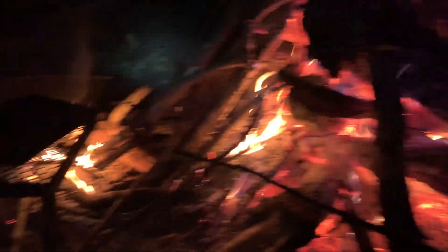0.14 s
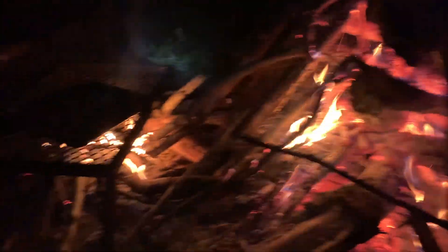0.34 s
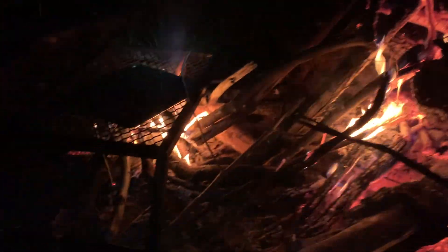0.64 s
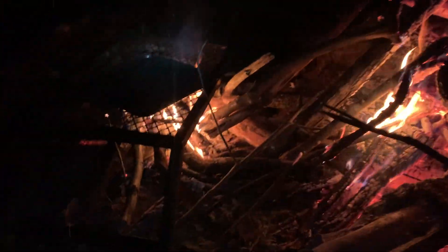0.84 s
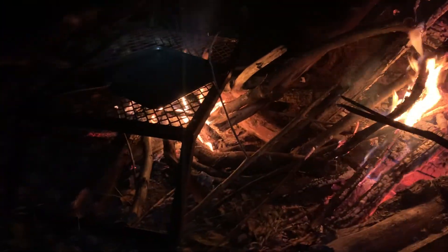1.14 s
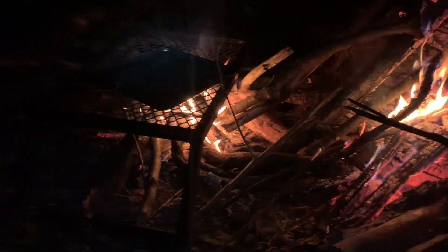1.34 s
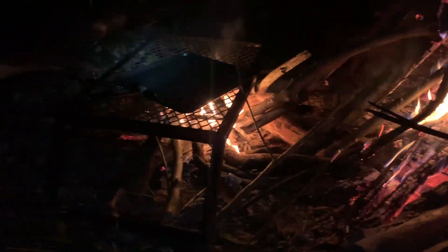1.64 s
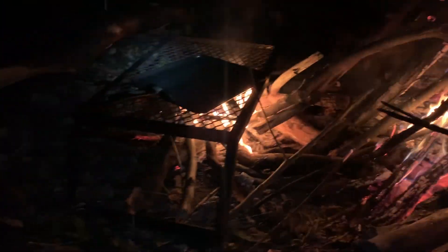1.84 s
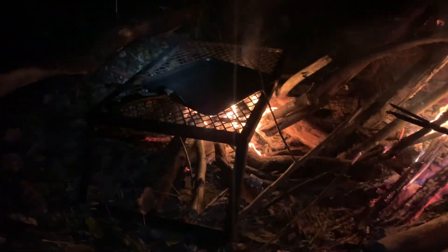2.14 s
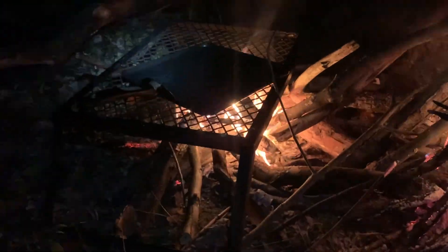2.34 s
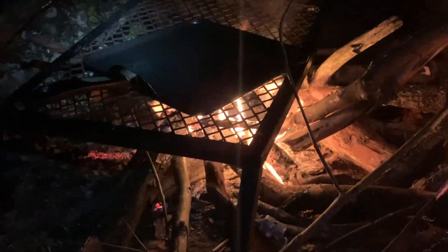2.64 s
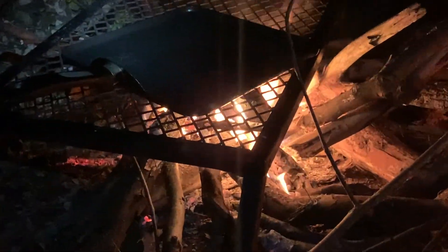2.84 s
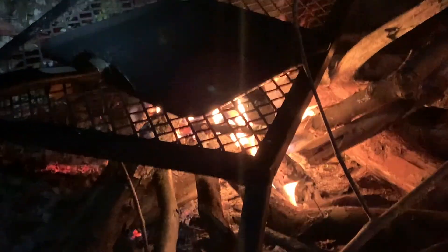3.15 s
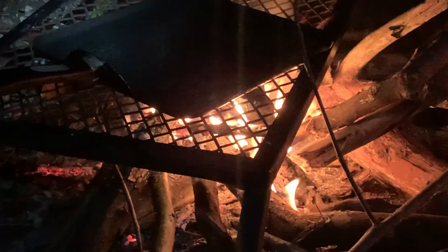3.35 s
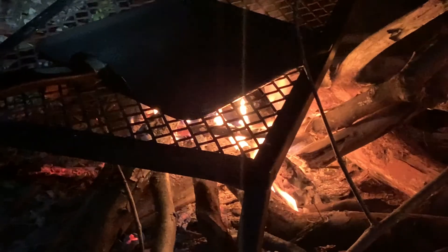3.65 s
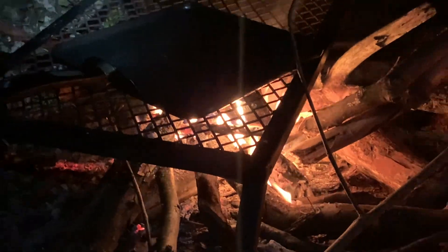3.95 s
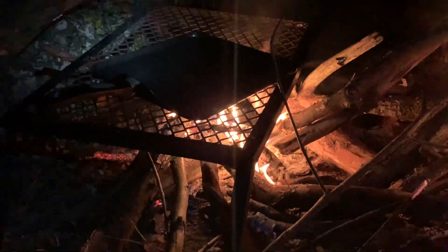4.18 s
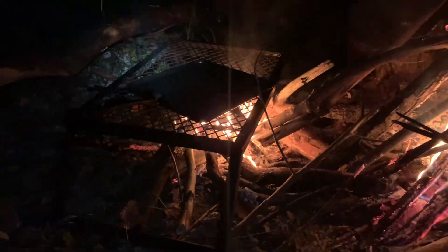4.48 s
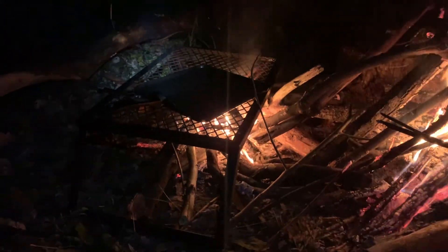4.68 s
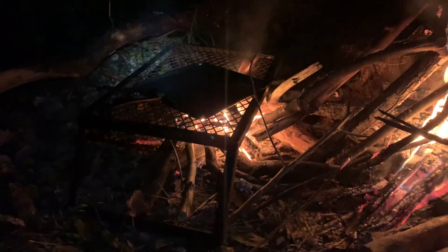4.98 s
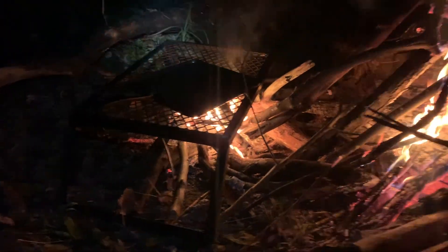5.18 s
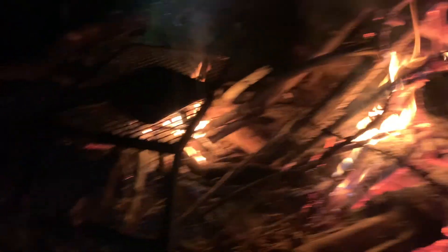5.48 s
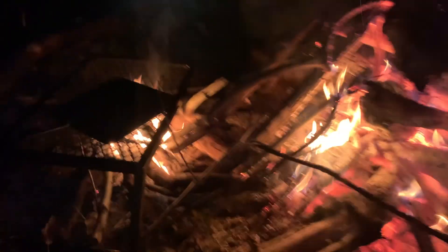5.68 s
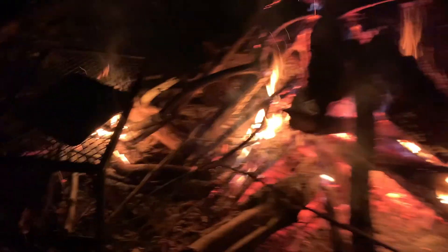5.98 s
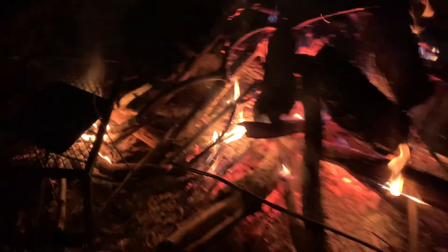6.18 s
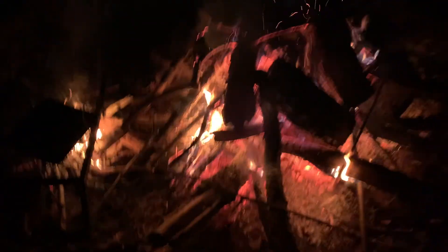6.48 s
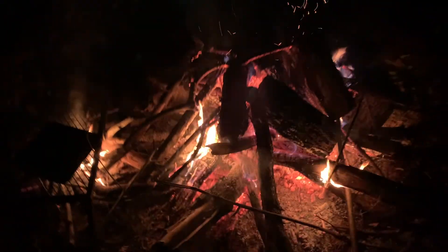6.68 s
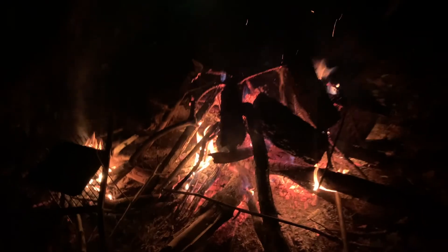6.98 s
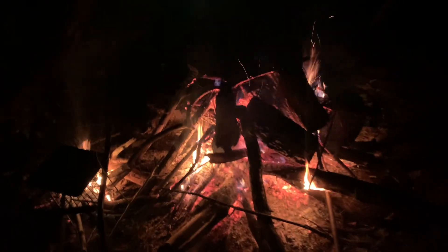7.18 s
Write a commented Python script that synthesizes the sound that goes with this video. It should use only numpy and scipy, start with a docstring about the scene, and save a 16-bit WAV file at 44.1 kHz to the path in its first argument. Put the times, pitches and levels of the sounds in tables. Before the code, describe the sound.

A brush fire burns close to a stereo microphone, slightly to the right, outdoors at night. Flames rumble and flutter softly throughout, under irregular sharp pops and fine ticks. It opens with a light rush of flame and a cluster of pops, and a branch knocks dryly at about 0.9 seconds. A sharp pop comes at 2.2 seconds, then the crackle thins until strong pops with dull knocks around 3.8 and 4 seconds. From 5.5 seconds the fire flares and the popping grows louder; a thick log splits with the loudest crack at 6.2 seconds. Steam hisses and embers snap after it, swelling again around 7 seconds, with a last knock near 7.3. Behind the fire, a few near crickets give short trills over a steady distant chorus and shriller insects. A faint, thin, wavering whine swells at about 2.2 seconds and recedes.

```python
"""Brush fire at night, close to a stereo microphone pair.

Turbulent flames rumble and flutter. Sap pockets burst with sharp pops, branches give way with a
knock, one thick log splits. Flare-ups bring a rush of gas, a hiss of steam and snapping embers.
Crickets trill by wing strokes: a few near, a blurred chorus far off. Behind them are shriller
small insects and a thin whine."""
import sys
import numpy as np
from scipy import signal
from scipy.fft import rfft, irfft
from scipy.io import wavfile
from scipy.ndimage import uniform_filter1d

SR = 44100
rng = np.random.default_rng(int(sys.argv[2]) if len(sys.argv) > 2 else 0)


def store_wav(level_fs):
    """Save 16-bit WAV to argv[1]."""
    pcm = np.round(np.clip(np.atleast_2d(level_fs), -1, 1) * 32767)
    wavfile.write(sys.argv[1], SR, pcm.T.astype(np.int16))


N = 322923
TIME_S = np.arange(N) / SR
FIRE_LAG_MS = .184  # fire on the right: left mic lags
STROKES_PER_S, STROKE_SPREAD_PER_S = 30.5, 1.43  # cricket wings: mean, spread between singers

# Flame and steam noise spectra. Each row: frequency in Hz, relative density in dB.
RUMBLE_SPECTRUM = [(15, -48), (25, -29), (50, 1), (80, -1), (130, -4), (190, -7), (260, -16), (400, -37),
                   (900, -104)]
FLUTTER_SPECTRUM = [(120, -34), (280, -4.5), (460, 2.5), (850, 3), (1250, -3), (2000, -8.5), (4000, -137)]
RUSH_SPECTRUM = [(700, 3), (1300, -1.5), (1750, 8), (2100, 7.5), (2600, 3), (4200, -5), (5200, -6),
                 (9000, -103)]
JET_SPECTRUM = [(200, -25), (600, -6), (2000, -2), (4000, -1), (5500, -3.5), (7200, 0), (9000, -4),
                (11000, -1.5), (13500, -8.5), (16000, -9.5)]
SIZZLE_SPECTRUM = [(300, -1), (2600, -3), (4200, 0), (5500, -4), (7000, 1), (9000, -3), (11000, -2),
                   (14500, 2.5), (16000, 2)]
# Flame envelopes. Each row: time in seconds, level in dB.
RUMBLE_LEVELS = [(0, -38), (.25, -39), (.65, -37.5), (1.5, -37.5), (2.02, -38.5), (2.14, -44), (2.3, -38.5),
                 (3.1, -39.5), (3.7, -38), (4.8, -40.5), (5.2, -38), (5.9, -41.5), (6.55, -43),
                 (6.85, -37.5), (7.1, -40.5), (7.32, -44)]
FLUTTER_LEVELS = [(0, -42), (1.9, -45.5), (2.9, -46.5), (4.2, -51), (5.2, -51), (7.32, -48)]
# Flare-ups. Each row: crest time, rise and fall in seconds, gas level and steam level in dB.
FLARES = [(0.017, 0.33, 0.57, -46.5, -59.5), (2.12, 0.1, 0.15, -53.5, -59.5),
          (5.566, 0.15, 0.22, -40.5, -52), (6.25, 0.089, .26, -41.5, -39), (7.05, .15, .16, -39, -40),
          (7.32, 0.13, .2, -39.5, -32.5)]
# Loudest sap bursts. Each row: start in seconds, level over 10 ms in dB, then woody body,
# 2.5 kHz bite and 13.5 kHz top as tone gains in dB, centre of the pop's broad tone peak in Hz,
# tear time in ms.
POPS = [(0.1642, -31, 6, 6, 2, 1400, 1.1), (0.1697, -27.5, 3, 0, -2, 2600, 0.67),
        (0.25, -34.5, 0, -8, -2, 15000, 0.49), (0.2607, -51, 18, 0, 0, 6400, 0.7),
        (0.28, -30, 10.5, 6, -1.5, 1600, 1), (0.4956, -28.5, 0, -1, 2, 15000, 0.67),
        (0.6134, -51, 14, 7, 3, 8800, 0.7), (0.826, -34, -3, -2, 11, 15000, 0.46),
        (0.8533, -25, 11, -1, 3, 4470, 0.69), (0.8803, -39, 0, 0, -4, 1600, 0.65),
        (0.917, -36, -5, -9, -2, 15000, 0.54), (0.9256, -38, -7, -7, 0, 3400, 0.63),
        (0.938, -26.5, -3, -12, 4.5, 13300, 0.75), (1.1605, -34, 6, -5, 17, 8800, 0.37),
        (1.1742, -37, -1, -3, 11, 8800, 0.6), (1.186, -33, -6, 5, 12, 8800, 1.7),
        (1.2814, -44, 10, 8, -8, 3800, 0.7), (1.3203, -30.5, 0, 3, 2, 15000, 0.3),
        (1.3527, -40, -5, -4, 3, 3400, 0.6), (1.5306, -45, 10, -1, -23, 5200, 0.54),
        (1.5575, -31.5, 0, -1, 9.5, 8900, 0.64), (1.596, -38, 3, 8, 11, 5200, 1.1),
        (1.8688, -38.5, 34, 8, -9, 4700, 1.3), (1.9064, -42.5, 13, 9, -1, 5200, 0.7),
        (1.9746, -38.5, 30, 14, 0, 2200, 0.9), (2.056, -43.5, -4, 0, -7, 4200, 0.58),
        (2.0632, -37, 15.5, 10, -2.5, 1500, 3.5), (2.0916, -37, -2, 4, -8, 13500, 3.7),
        (2.147, -42.5, 3, 2, 9, 7900, 0.55), (2.1582, -36, 10, -1, -6.5, 5800, 0.7),
        (2.1692, -21.5, -4, -8, 4.5, 4660, 1.1), (2.1868, -42.5, 0, 2, 4, 1800, 0.7),
        (2.5348, -41, 5, 0, -3, 15000, 1), (2.9388, -39, 15, -2, -17, 4200, 1),
        (3.0006, -36.5, 4, 3, 14, 8800, 1), (3.5183, -38.5, 11, -18, -0.5, 2000, 0.67),
        (3.5523, -34.5, 9.5, -7, -3, 5140, 1.1), (3.6185, -26, -4, -2, 1, 15000, 0.4),
        (3.6377, -41, 1, -9, 6, 8800, 0.56), (3.6474, -32.5, -8, -11, 6, 8800, 2.4),
        (3.6823, -42.5, 12, 1, -2.5, 1300, 0.7), (3.7986, -19.5, -1, -8, 6.5, 8800, 2.2),
        (3.809, -42, 4, 1, 0, 8800, 0.7), (3.816, -47, -5, -2, 3, 8800, 0.7),
        (3.9948, -23, 2, 4, 8.5, 6460, 1.9), (4.0414, -36.5, 0, -10, -3, 15000, 0.36),
        (4.1425, -35.5, -11, -6, 5, 9800, 0.3), (4.5402, -37.0, 10.5, -14, -3.5, 5200, 0.17),
        (4.861, -42, -5, -3, 19, 7900, 0.5), (4.997, -40, 4, -4, 10, 4200, 0.44),
        (5.0567, -42, -10, -5, -2, 15000, 0.6), (5.067, -32, -2, -5, 5, 1300, 1.8),
        (5.137, -38, -12, 1, 6, 7000, 4.6), (5.171, -44, 1, -1, -4, 12100, 0.8),
        (5.289, -32, 2, -6, 3, 4200, 1.9), (5.447, -37, 3.5, -8, -8, 1300, 0.55),
        (5.5814, -46, 20, 14, 0, 1300, 0.7), (5.6126, -27.5, 2, -1, 10, 8800, 0.19),
        (5.6214, -34.5, 0.5, -1, -15.5, 12100, 0.44), (5.6558, -37, 2.5, -6, -9, 15000, 0.76),
        (5.6671, -37, 7, 4, -20, 10900, 0.68), (5.7121, -32, 13, 2, 4, 8800, 2.1),
        (5.756, -20.5, -5.5, 5, -6, 10000, 0.33), (5.7674, -38.5, 6, -3, 5, 4200, 0.62),
        (6.027, -16.5, -5.5, -9, 3, 10100, 0.67), (6.1027, -36, -14, -9, 4, 7900, 0.99),
        (6.149, -16.5, -1.5, -1, 5, 7300, 0.58), (6.1659, -28, 3.5, -3, -13.5, 12100, 0.56),
        (6.1818, -11.5, -8, -10.5, -14.5, 1880, 1.6), (6.233, -27, -6, -2, -10, 1290, 1.9),
        (6.3075, -24.5, 4, -2, -12, 3500, 0.46), (6.3182, -33, -1, -1, -7, 2700, 0.63),
        (6.3442, -32, -10, -6, 8, 8800, 0.7), (6.4117, -37, -12, 3, 4, 2700, 0.7),
        (6.5105, -37.5, -1, 13, -2, 4200, 0.87), (6.6548, -37, -2, 7, 4, 9900, 1),
        (6.7105, -39.0, 11, 12, -22, 5200, 0.7), (6.763, -37, -8, 7, 12, 8900, 1.1),
        (7.0197, -43, -1, 6, -8, 2000, 0.61), (7.038, -32.5, 3, -6, -4, 15000, 1.4),
        (7.0642, -33, -6, -6, 9, 7900, 1.3), (7.0752, -44, -2, 11, 3, 2500, 0.63),
        (7.1953, -35, 7, -1, 0, 1300, 0.7), (7.2647, -25, 14, 11, -12, 5200, 0.71)]
# Pop bearing: dull from the heart of the pile, bright from its right edge.
# Each row: top minus any body boost in dB, left mic lag in ms.
BEARINGS = [(-19, -.095), (-11, .188)]
# Hollows between the sticks. Each row: resonance in Hz, width in Hz, gain in dB.
HOLLOWS = [(834, 83, 0), (1200, 140, 2), (1850, 130, 2.5), (2680, 140, -2), (3600, 300, -1),
           (4600, 350, -4), (7010, 650, -1.5)]
# Branches giving way. Each row: start in seconds, level over 10 ms in dB, tilt in dB per octave.
THUDS = [(0.8638, -26.5, -3), (2.9387, -32.5, -7), (3.8, -31, -2), (3.9964, -36, -6), (6.147, -36, 10),
         (7.266, -27, -5.5)]
# The log splitting: start in seconds, level over 10 ms in dB.
LOG_SPLIT = (6.1828, -19)
# Wood modes. Each row: frequency in Hz, relative level in dB, T60 in seconds.
BRANCH_MODES = [(208, 3.5, 0.028), (452, 2, 0.016), (820, 5.5, 0.015), (1160, 1.5, 0.011),
                (1380, -8, 0.017), (1900, -14, .025), (2460, 4.5, 0.022)]
LOG_MODES = [(223, 7.5, 0.047), (302, 1, 0.06), (525, -27, .04), (727, 9.5, 0.028), (1290, 8, 0.021),
             (1790, 14.5, 0.019), (1830, -8, .025), (3550, 17.5, 0.023)]
# Short echoes of each crack. Each row: delay in ms, gain in dB.
SHORT_ECHOES = [(13.2, -20), (14.6, -23), (17.3, -16.5)]
# Near crickets. Each row: start and end in seconds, pitch in Hz, level in dB.
TRILLS = [(0, 0.304, 3340, -58), (0.299, 0.616, 3205, -44.5), (0.548, 1.046, 3426, -52.5),
          (.598, 0.86, 3200, -51.5), (1.17, 1.56, 3345, -47.5), (1.6, 2.104, 3337, -54),
          (2.28, 2.794, 3310, -53.5), (3.048, 3.42, 4010, -61), (3.273, 3.833, 3110, -52.5),
          (3.298, 3.8, 3700, -56.5), (3.281, 3.835, 3250, -53.5), (3.858, 4.082, 3370, -52),
          (5.366, 5.563, 3240, -48.5), (5.922, 6.16, 3143, -48), (6.32, 6.583, 3140, -47.5)]
# Far insect spectra. Each row: frequency in Hz, relative density in dB.
CHORUS_SPECTRUM = [(2500, -34), (2900, -7), (3100, 0), (3350, -5.5), (3550, 1), (3750, -8), (4100, -11),
                   (5000, -68)]
SHRILL_SPECTRUM = [(3400, -13), (3800, 2.5), (4250, 8.5), (4600, 0.5), (5100, -24.5), (6700, 5.5),
                   (8000, -45)]
# Background envelopes. Each row: time in seconds, level in dB.
CHORUS_LEVELS = [(0, -48), (1.4, -46.5), (2.2, -49.5), (2.7, -49.5), (3.4, -45.5), (4.7, -49.5),
                 (5.35, -45), (5.8, -48), (6.3, -43.5), (6.8, -46), (7.32, -43)]
SHRILL_LEVELS = [(0, -53), (2.7, -54), (3.3, -54), (4.2, -52), (4.9, -55.5), (6.4, -52), (7.32, -53)]
WHINE_LEVELS = [(0, -73.5), (1.55, -68.5), (1.7, -63.5), (2.0, -55.5), (2.22, -53), (2.36, -57.5),
                (2.7, -59.5), (2.85, -68.5), (3.4, -65.5), (3.6, -62.5), (4.6, -63), (5.4, -63.5),
                (6, -74.5), (7.32, -65)]


def flames(gas_gain, calm_rush_db=-58, flare_flutter_db=-20):
    """Burning gas: deep billowing, mid flutter, brighter rush. Flare-ups drive the last two."""
    rumble = noise(RUMBLE_SPECTRUM, coherence=.66, patchy_db=1.88, flicker_db=.75, size=2048)
    flutter = noise(FLUTTER_SPECTRUM, coherence=.08, patchy_db=2.3, flicker_db=1)
    rush = noise(RUSH_SPECTRUM, coherence=.24, patchy_db=2, flicker_db=1.5)
    rumble *= envelope(RUMBLE_LEVELS)
    flutter *= np.hypot(envelope(FLUTTER_LEVELS), gain(flare_flutter_db) * gas_gain)
    rush *= np.hypot(gain(calm_rush_db), gas_gain)
    return (rumble + flutter + rush) * gain([[-.6], [.6]])


def flare_gains():
    """Gas and steam gains: each flare-up swells and dies away; overlaps sum in power."""
    power = np.zeros((2, N))
    for crest_s, rise_s, fall_s, gas_db, steam_db in FLARES:
        t = TIME_S - crest_s
        swell = np.exp(-np.where(t < 0, (t / rise_s) ** 2, abs(t / fall_s)))
        power += (gain([[gas_db], [steam_db]]) * swell) ** 2
    return np.sqrt(power)


def pop(db, body_db, bite_db, top_db, peak_hz, tear_ms, lag_ms, peak_q=3.1, peak_db=2.5, size=2048):
    """Fibres tear; hollows and a broad peak colour the crack; the pile scatters it to each mic."""
    ms = np.maximum(np.arange(size) / SR * 1000 - 1, 0)  # 1 ms lead-in
    hz = np.fft.rfftfreq(size, 1 / SR)
    tear, *scatter = rng.standard_normal((3, size))
    tear *= (1 - np.exp(-ms / .02)) * np.exp(-(ms / (1.3 * tear_ms)) ** 2)
    crack = rfft(unit_rms(tear))
    crack *= np.sqrt(size / uniform_filter1d(abs(crack) ** 2, size=110))  # whiten
    mic_delays = np.exp(-2j * np.pi * hz * np.array([[lag_ms], [0]]) / 1000)
    echoes = rfft(unit_rms(np.array(scatter) * (1 - np.exp(-ms / .7)) * np.exp(-ms / 3.3)))
    echoes *= gain(spectrum_db([(5000, -1.5), (14000, -8)], hz))  # lows linger in the pile
    detune = 1 + .035 * rng.standard_normal()
    hollows = 1 + sum(gain(ring_db) / (1 + 2j * (hz - centre_hz * detune) / width_hz)
                      for centre_hz, width_hz, ring_db in HOLLOWS)
    peak = 1 + gain(peak_db) / (1 + 2j * peak_q * (hz / peak_hz - 1))
    colour = [(100, body_db - 12), (400, body_db - 3), (1000, body_db - 2.5), (2500, bite_db),
              (5000, 0), (9000, 0), (13500, top_db), (16000, top_db + .5)]
    spectrum = (crack * mic_delays + echoes) * hollows * peak * gain(spectrum_db(colour, hz))
    return at_level_10ms(irfft(spectrum), db)


def twig_hz(thinness, low_hz=1800, high_hz=11000):
    """Thinner twigs have a higher tone peak."""
    return low_hz * (high_hz / low_hz) ** thinness


def crackle(tick_floor_db=-54, spread_db=3.4, triggered_share=.25, ticks=240):
    """Loud sap pops, plus twig ticks deeper in the pile, some set off by a pop."""
    out = np.zeros((2, N))
    for start_s, db, body_db, bite_db, top_db, peak_hz, tear_ms in POPS:
        lag_ms = np.interp(top_db - max(body_db, 0), *np.transpose(BEARINGS))
        add(out, start_s - .001, pop(db, body_db, bite_db, top_db, peak_hz, tear_ms, lag_ms))
    for k, (place, wait, strength, dull, thinness) in enumerate(rng.random((ticks, 5))):
        if wait < triggered_share:
            start_s = POPS[int(place * len(POPS))][0] + wait ** 2
        else:
            start_s = (k + place) / ticks * N / SR
        db = tick_floor_db + spread_db * min(-np.log(1 - strength), 2.6)
        tick = pop(db, body_db=16 * dull - 3, bite_db=9 * dull - 3, top_db=3 - 12 * dull,
                   peak_hz=twig_hz(thinness), tear_ms=.58, lag_ms=FIRE_LAG_MS)
        add(out, start_s, tick)
    return out


def branch_thuds(scrape_db=-7, scrape_s=.0085, size=4096):
    """Branches give way: a dry modal knock and a brief scrape."""
    out, t = np.zeros((2, N)), np.arange(size) / SR
    for start_s, db, tilt_db in THUDS:
        length_ratio = rng.uniform(.95, 1.05)
        knock = np.zeros((2, size))
        for k, (hz, mode_db, t60_s) in enumerate(BRANCH_MODES):
            phase = rng.uniform(-1.36, 1, (2, 1)) + np.pi * k
            decay = gain(mode_db + tilt_db * np.log2(hz) - 60 * t / t60_s)
            knock += decay * np.sin(2 * np.pi * hz / length_ratio * t + phase)
        scrape = butterworth(rng.standard_normal((2, size)), 2, 2000) * np.exp(-t / scrape_s)
        add(out, start_s, at_level_10ms(unit_rms(knock) + gain(scrape_db) * unit_rms(scrape), db))
    return out


def log_split(size=4096):
    """A thick log cracks open with the loudest pop and rings briefly."""
    out, t = np.zeros((2, N)), np.arange(size) / SR
    start_s, db = LOG_SPLIT
    ring = np.zeros((2, size))
    for hz, mode_db, t60_s in LOG_MODES:
        phase = rng.uniform(-.67, 1, (2, 1))
        ring += gain(mode_db - 60 * t / t60_s) * np.sin(2 * np.pi * hz * t + phase)
    add(out, start_s, at_level_10ms(ring, db))
    return out


def steam(jet_gain, spits_per_s=1500, spit_db=-4, clump_db=4, sizzle_db=-52.5):
    """A jet from burst wood, full of tiny spits, over a faint even sizzle."""
    jet = noise(JET_SPECTRUM, coherence=.88, patchy_db=.8, flicker_db=.9, lag_ms=FIRE_LAG_MS, size=256)
    spits = rng.standard_normal(N) * (rng.random(N) < spits_per_s / SR)
    spits *= gain(clump_db * drift(48))
    spits = unit_rms(butterworth(spits, 1, [1500, 11000], "band"))
    spits = np.array([np.roll(spits, round(FIRE_LAG_MS * SR / 1000)), spits])
    sizzle = noise(SIZZLE_SPECTRUM, coherence=.8, patchy_db=.9, flicker_db=.6,
                   lag_ms=FIRE_LAG_MS, size=256)
    return (jet + gain(spit_db) * spits) * jet_gain + gain(sizzle_db) * sizzle


def embers(jet_gain, floor_re_jet_db=-4.5, spread_db=1.8, count=80):
    """Embers snap in the steam jet: denser and louder the harder it blows."""
    out = np.zeros((2, N))
    jet_share = np.cumsum(jet_gain) / np.sum(jet_gain)
    for when, strength, dull, bearing, thinness in rng.random((count, 5)):
        at = min(np.searchsorted(jet_share, when), N - 1)
        db = floor_re_jet_db + 20 * np.log10(jet_gain[at]) + spread_db * min(-np.log(1 - strength), 3)
        snap = pop(db, body_db=14 * dull - 4, bite_db=12 * dull - 2, top_db=-8 * dull,
                   peak_hz=twig_hz(thinness), tear_ms=.86, lag_ms=FIRE_LAG_MS * bearing)
        add(out, at / SR, snap)
    return out


def trill(size, hz, strokes_per_s, sag=.03, jitter=.008, uneven_db=1.8, fade_s=.045):
    """Each wing stroke is a short tone sagging in pitch; strokes vary in pitch and force."""
    stroke, progress = np.divmod(np.arange(size) * strokes_per_s / SR, 1)
    detune, force = rng.standard_normal((128, 2))[stroke.astype(int) % 128].T
    cycles = np.cumsum(hz * (1 + jitter * detune - sag * (progress - .5))) / SR
    tone = np.sin(2 * np.pi * (cycles + rng.uniform(-.23, .17, (2, 1))))
    pulses = np.sin(np.pi * progress) ** 2 * gain(uneven_db * force)
    return unit_rms(tone * pulses * signal.windows.tukey(size, 2 * fade_s * SR / size))


def near_crickets(rasp_depth=.4):
    """A few singers and their echo; the wing file catches unevenly and rasps."""
    out = np.zeros((2, N))
    rasp = 1 + rasp_depth * drift(290)
    for start_s, end_s, hz, db in TRILLS:
        singing = (TIME_S > start_s) & (TIME_S < end_s)
        song = trill(singing.sum(), hz, rng.normal(STROKES_PER_S, STROKE_SPREAD_PER_S))
        add(out, start_s, gain(db) * song * rasp[singing])
    return out + gain(-3) * outdoor_echo(out, t60_s=.3)


def cricket_chorus(mean_hz=3345, spread_hz=105, count=200):
    """Half-second trills all around; the farthest blur into noise."""
    crowd = np.zeros((2, N))
    for start_s in np.linspace(-.5, N / SR, count):
        pitch, pace, side = rng.standard_normal(3)
        song = trill(SR // 2, mean_hz + spread_hz * pitch, STROKES_PER_S + STROKE_SPREAD_PER_S * pace)
        add(crowd, start_s, song * [[1], [np.sign(side)]])  # some bearings arrive in antiphase
    blur = noise(CHORUS_SPECTRUM, coherence=.024, patchy_db=2.5, flicker_db=2, size=1024)
    return (gain(.5) * unit_rms(crowd) + gain(-2) * blur) * envelope(CHORUS_LEVELS)


def small_insects():
    """Far, shrill insects merged into two bands of noise."""
    shrill = noise(SHRILL_SPECTRUM, coherence=.041, patchy_db=1.8, flicker_db=.8, size=1024)
    return shrill * envelope(SHRILL_LEVELS)


def whine(base_hz=1643, waver=.013, pitch_rise=.035, shake_db=3.5):
    """A thin, distant tone that wavers and rises slightly as it swells."""
    swell = envelope(WHINE_LEVELS)
    hz = base_hz * (1 + waver * drift(34) + pitch_rise * (swell / swell.max()) ** 2)
    tone = np.sin(2 * np.pi * np.cumsum(hz) / SR)[None] * gain(shake_db * drift(25))
    return unit_rms(tone + gain(-6) * outdoor_echo(tone, t60_s=.3)) * swell


def wood_echo(wood):
    """Each crack returns in a few short, dull echoes; leaves and soil add a faint, dull tail."""
    dulled = butterworth(wood, 1, 3500)
    echo = gain(-20) * outdoor_echo(dulled, t60_s=.22)
    for delay_ms, db in SHORT_ECHOES:
        add(echo, delay_ms / 1000, gain(db) * dulled)
    return echo


def outdoor_echo(x, t60_s, tap_share=.06, predelay_s=.004):
    """Sparse reflections off ground and trees."""
    t = np.arange(SR // 2) / SR
    taps = rng.standard_normal((2, len(t))) * (rng.random((2, len(t))) < tap_share)
    taps *= gain(-60 * t / t60_s) * (t > predelay_s)
    return signal.oaconvolve(x, taps / np.linalg.norm(taps[0]), axes=1)[:, :N]


def noise(spectrum, coherence, patchy_db, flicker_db, lag_ms=0, size=512):
    """Turbulent stereo noise, unit RMS: drifting spectral patches and a broadband flicker."""
    frames, hz = 4 * N // size + 6, np.fft.rfftfreq(size, 1 / SR)
    right_re, right_im, own_re, own_im, patches = rng.standard_normal((5, frames, len(hz)))
    patches = uniform_filter1d(patches, size=10, axis=0)
    patches = unit_rms(uniform_filter1d(patches, size=5, axis=1))
    flicker = unit_rms(uniform_filter1d(rng.standard_normal((frames, 1)), size=5, axis=0))
    right = right_re + 1j * right_im
    shared = coherence * right * np.exp(-2j * np.pi * hz * lag_ms / 1000)
    left = shared + np.sqrt(1 - coherence ** 2) * (own_re + 1j * own_im)
    shape = gain(spectrum_db(spectrum, hz) + patchy_db * patches + flicker_db * flicker)
    bins = np.array([left, right]) * shape
    _, sound = signal.istft(bins.swapaxes(1, 2), nperseg=size, noverlap=size - size // 4)
    return unit_rms(sound[:, :N])


def drift(bandwidth_hz):
    """Smooth random curve, unit RMS."""
    lowpass = np.exp(-(np.fft.rfftfreq(N, 1 / SR) / bandwidth_hz) ** 2)
    return unit_rms(irfft(rfft(rng.standard_normal(N)) * lowpass, N))


def gain(db):
    return 10 ** (np.asarray(db) / 20)


def unit_rms(x):
    return x / np.sqrt(np.mean(x ** 2) + 1e-20)


def at_level_10ms(burst, db):
    """Scale to the energy of 10 ms at this level."""
    return gain(db) * unit_rms(burst) * np.sqrt(.01 * SR / burst.shape[1])


def spectrum_db(rows, hz):
    """Interpolate over log frequency."""
    row_hz, row_db = np.transpose(rows)
    return np.interp(np.log(hz + 1), np.log(row_hz + 1), row_db)


def envelope(rows):
    """Per-sample gain from a dB curve."""
    return gain(np.interp(TIME_S, *np.transpose(rows)))


def butterworth(x, order, hz, kind="low"):
    return signal.sosfilt(signal.butter(order, hz, kind, fs=SR, output="sos"), x)


def add(mix, start_s, sound):
    """Mix in place, cropped at both ends."""
    at = round(start_s * SR)
    part, sound = mix[:, max(at, 0):], sound[:, max(-at, 0):]
    part[:, :sound.shape[1]] += sound[:, :part.shape[1]]


def scene(calm_steam_db=-60):
    """Fire and insects in the open."""
    gas_gain, steam_gain = flare_gains()
    jet_gain = np.hypot(gain(calm_steam_db), steam_gain)
    wood = crackle() + embers(jet_gain) + branch_thuds() + log_split()
    fire = wood + wood_echo(wood) + flames(gas_gain) + steam(jet_gain)
    return fire + near_crickets() + cricket_chorus() + small_insects() + whine()


def record(dry, low_cut_hz=36, clip_level=.9, band_limit_hz=16100):
    """Mic bass roll-off, input overload on the loudest pops, then the band limit."""
    clipped = np.clip(butterworth(dry, 3, low_cut_hz, "high"), -clip_level, clip_level)
    lowpass = signal.firwin(255, band_limit_hz, window=("kaiser", 8), fs=SR)
    return signal.oaconvolve(clipped, lowpass[None], "same")


dry = scene()
out = record(dry)
store_wav(out)
```